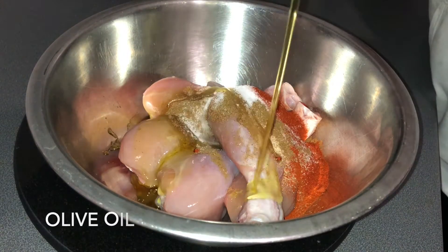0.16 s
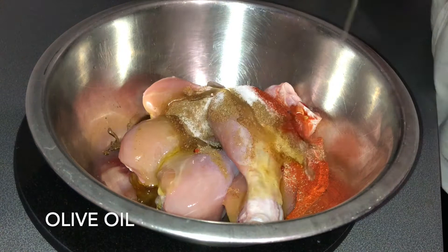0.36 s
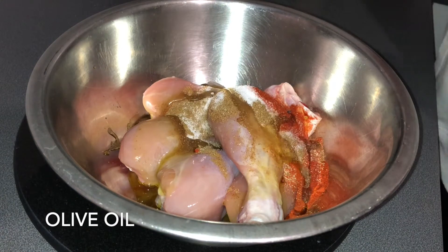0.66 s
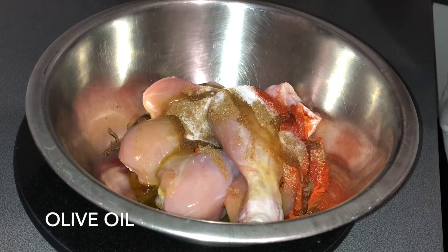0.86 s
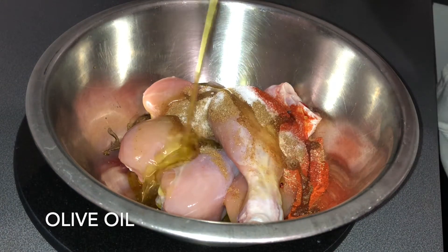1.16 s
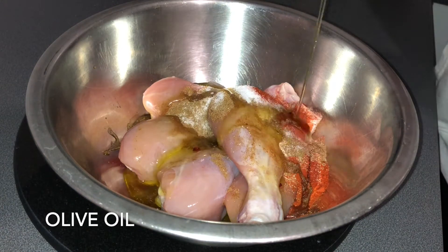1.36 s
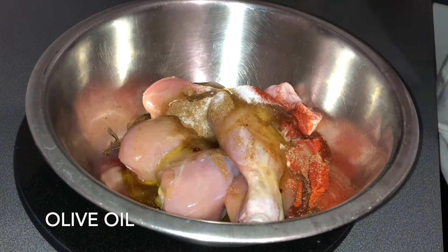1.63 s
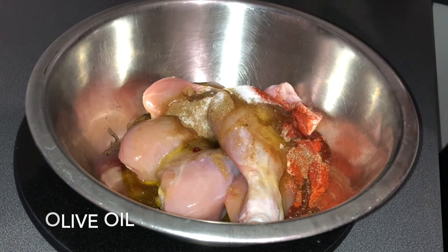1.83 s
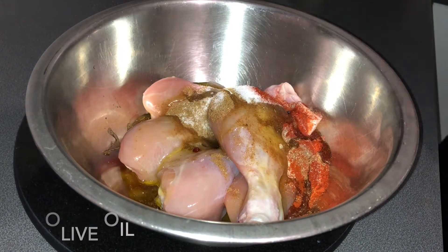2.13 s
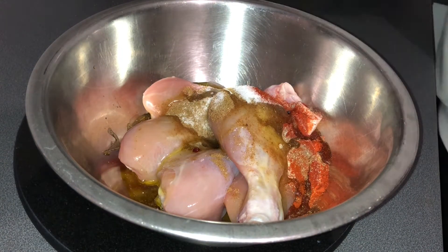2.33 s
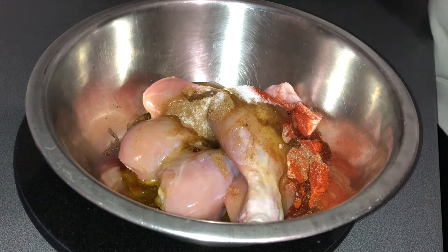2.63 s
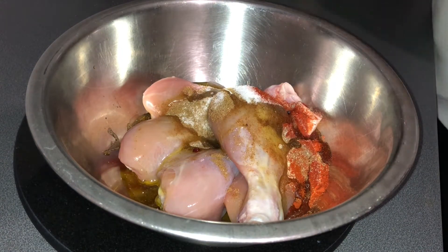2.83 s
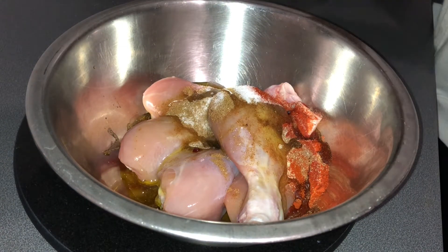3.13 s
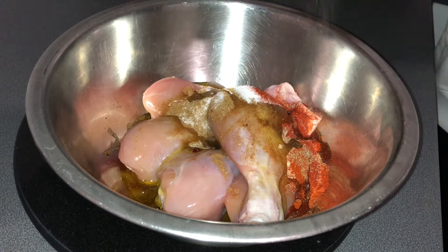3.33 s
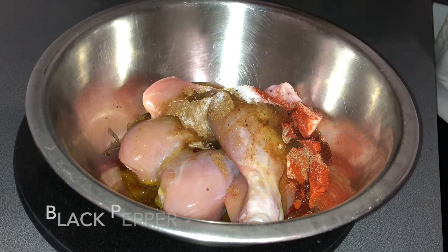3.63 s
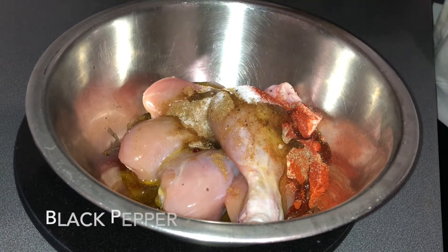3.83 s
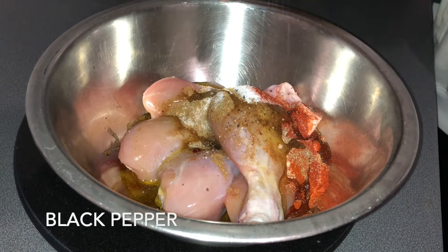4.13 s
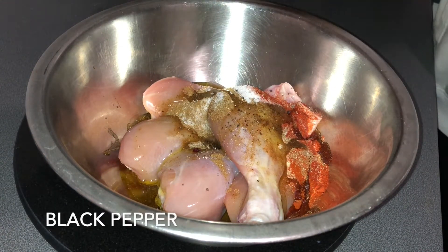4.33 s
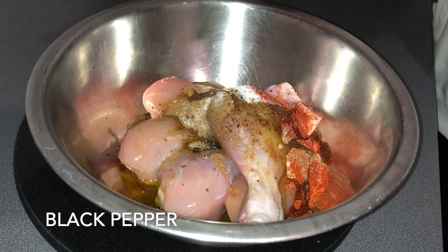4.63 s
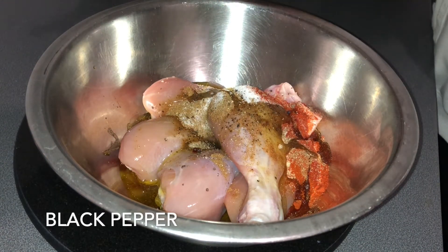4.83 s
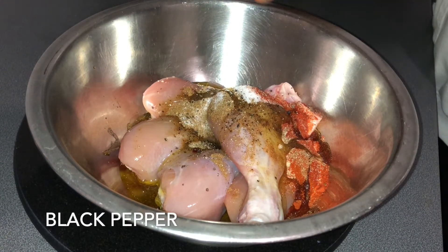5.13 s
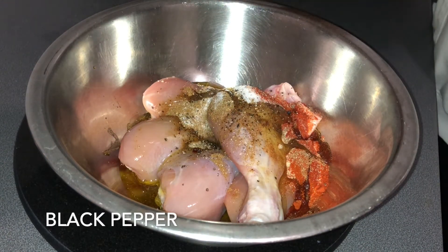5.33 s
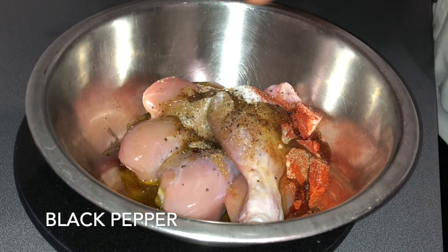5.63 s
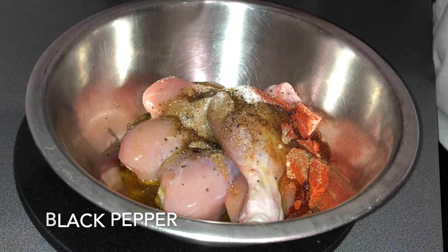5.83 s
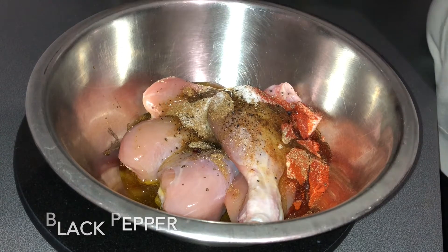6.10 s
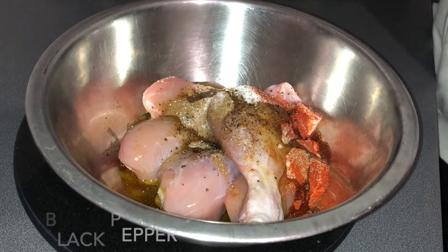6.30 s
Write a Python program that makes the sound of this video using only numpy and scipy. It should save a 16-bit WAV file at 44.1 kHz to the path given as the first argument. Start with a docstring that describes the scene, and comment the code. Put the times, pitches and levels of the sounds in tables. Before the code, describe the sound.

In a quiet kitchen, a bottle is set down and handled, then a pepper mill is twisted in short crunchy strokes and put down.

```python
"""A quiet kitchen with a fan and a faint hum, made from shaped noise and wavering tones.
A bottle is set down and handled on the worktop: blows ring its modes, rubbing fingers are grainy noise.
Then a pepper mill is twisted in short strokes over a steel bowl: the burrs crunch, corns crack and tumble
inside, all as tiny impacts ringing the mill's modes, and it is put back on the worktop."""
import sys
import numpy as np
from scipy import signal
from scipy.fft import rfft, irfft
from scipy.io import wavfile
from scipy.ndimage import uniform_filter1d

SR = 44100
rng = np.random.default_rng(int(sys.argv[2]) if len(sys.argv) > 2 else 0)


def persist_wave(psi):
    """Save psi, clipped to +-1, as 16-bit WAV."""
    counts = np.round(np.clip(psi, -1, 1) * 32767).astype(np.int16)
    wavfile.write(sys.argv[1], SR, np.atleast_2d(counts).T)


N = 284886  # length of the scene in samples


def gain_of(db):
    """Turns decibels into a gain."""
    return 10 ** (np.asarray(db) / 20)


def evened(x):
    """Scales a sound to an rms of 1."""
    return x / np.sqrt(np.mean(x ** 2) + 1e-20)


def read(points, hz):
    """Reads a curve of (Hz, value) points on a log-frequency axis."""
    f, value = np.transpose(points)
    return np.interp(np.log(hz + 1), np.log(f + 1), value)


def add(mix, s, sound):
    """Mixes a sound in, starting at time s in seconds."""
    part = mix[round(s * SR):][:len(sound)]
    part += sound[:len(part)]


def follow(points):
    """Joins (seconds, value) points into a curve over all samples."""
    return np.interp(np.arange(N) / SR, *np.transpose(points))


def resonate(x, hz, width):
    """Rings a two-pole resonance with gain near 1 at its centre; width in Hz."""
    r = np.exp(-np.pi * width / SR)
    return signal.lfilter([1 - r, 0, r - 1], [1, -2 * r * np.cos(2 * np.pi * hz / SR), r * r], x)


def coloured(x, points):
    """Filters a sound by a spectrum curve and scales it to an rms of 1."""
    gain = gain_of(read(points, np.fft.rfftfreq(N, 1 / SR)))
    return evened(irfft(rfft(x) * gain, N))


def split(x, hz):
    """Gives the parts below and above hz."""
    low = signal.butter(4, hz, fs=SR, output="sos")
    high = signal.butter(4, hz, "high", fs=SR, output="sos")
    return signal.sosfilt(low, x), signal.sosfilt(high, x)


def wander(shape, size, axis=-1):
    """Random noise smoothed by a running mean over size samples."""
    return uniform_filter1d(rng.standard_normal(shape), size=size, axis=axis)


def grains(per_s, spread_db, smooth):
    """Tiny impacts about a millisecond long, most small and a few large, over a share of smooth hiss."""
    size_db = spread_db * np.minimum(rng.exponential(1, N), 3)
    hits = gain_of(size_db) * (rng.random(N) < per_s / SR)
    swell = np.sqrt(np.convolve(hits ** 2, np.hanning(50), "same"))
    return (evened(swell) + smooth) * rng.standard_normal(N)


# Every stroke of the hand swells from and dies to EDGE_DB under its full force, then goes on fading.
EDGE_DB, RISE_BEND, FALL_BEND = -28, 1.48, 1.49


def stroke(s, rise, hold, fall, db):
    """Force of one movement of the hand: it swells, holds and dies away."""
    t = np.arange(N) / SR - s
    before = np.maximum(-t / rise, 0)
    after = np.maximum((t - hold) / fall, 0)
    return gain_of(db + EDGE_DB * (before ** RISE_BEND + after ** FALL_BEND))


def blended(rows, rest, first, second):
    """Plays three parts under strokes; a row's last two columns give the shares of the last two parts."""
    power = np.zeros((3, N))
    for *shape, first_db, second_db in rows:
        a, b = np.minimum(gain_of([first_db, second_db]), 1) ** 2
        shares = [max(1 - a - b, .03), a, b]
        power += np.outer(shares, stroke(*shape) ** 2)
    parts = [evened(rest), evened(first), evened(second)]
    return (np.sqrt(power) * parts).sum(axis=0)


# Colour of the broad fan and room noise. Each row: frequency in Hz, relative level in dB per Hz.
AIR_COLOUR = [(24, -75), (40, -24.5), (87, -3), (168, -25), (206, -33), (239, 2.5), (406, 2), (473, -12),
              (656, -36), (725, -2.5), (1990, -7), (2200, -28.5), (2370, -14), (10500, -30), (16500, -24)]
# Level of the room noise over time. Each row: time in seconds, level in dB.
AIR_LEVEL = [(0., -70), (1.33, -70), (2.3, -65.5), (3.85, -65.5), (4.05, -63.5), (5.43, -66.5),
             (5.97, -69.5), (6.2, -67.5), (6.46, -74.5)]
# Noise resonances of the duct. Each row: frequency in Hz, width in Hz, level in dB over the broad noise.
DUCT = [(158.6, 17, -2), (275, 45, -15.5), (495, 44, -3), (586, 20, -5.5), (1746, 540, 1.5)]
# Tones of the hum. Each row: frequency in Hz, level of the steady part in dB rms.
HUM = [(96.9, -74.5), (161.5, -77), (242.2, -77), (441.4, -77), (473.7, -75.5), (737.5, -82)]


def air():
    """Fan noise with drifting patches, a few duct resonances and a wavering hum."""
    frames, bin_hz = N // 256 + 5, np.fft.rfftfreq(1024, 1 / SR)
    a, b, patches = rng.standard_normal((frames, 513, 3)).T
    patches = evened(uniform_filter1d(uniform_filter1d(patches, 10, 0), 12, 1))
    spectrum = (a + 1j * b) * gain_of(read(AIR_COLOUR, bin_hz)[:, None] + 1.5 * patches)
    wash = evened(signal.istft(spectrum, nperseg=1024, noverlap=768)[1][:N])
    duct = np.zeros(N)
    for hz, width, db in DUCT:
        duct += gain_of(db) * evened(resonate(rng.standard_normal(N), hz, width))
    hum = np.zeros(N)
    for hz, db in HUM:
        steady = evened(np.sin(2 * np.pi * hz * np.arange(N) / SR))
        waver = evened(resonate(rng.standard_normal(N), hz, 6.2))
        hum += gain_of(db) * (steady + .5 * waver)
    return (wash + duct) * gain_of(follow(AIR_LEVEL)) + hum


# Fingers rubbing bottle and mill. Each row: full force from this time in seconds, rise, hold and fall
# in seconds, level in dB, share of the squeak in dB, share of the hiss in dB (above 0 counts as 0).
RUSTLES = [(.002, .005, 0.022, .03, -75, -24, 0), (1.288, .005, .022, .04, -70, -26, 2),
           (1.72, .01, 0.065, .01, -77, -9.5, -17), (1.814, 0.0055, .01, 0.17, -62, -5.5, -18),
           (1.882, .008, .02, .12, -59, -16, -21), (1.952, 0.02, 0.004, 0.037, -47, -21, -21),
           (2.015, 0.021, .015, .05, -61, -9, -2), (2.24, .04, 0.099, .02, -69, -11, -14),
           (2.342, .01, .01, 0.073, -61.5, -26, -14), (2.568, .04, 0.055, 0.038, -61, -20, -3.5),
           (2.812, .008, 0.032, 0.026, -62, -22, 1), (2.866, .03, .015, .04, -63, -12, -11),
           (3.03, .005, .062, .04, -63.5, -22, -2.5), (6.358, 0.036, .005, .07, -72.5, -4.5, -8),
           (6.442, 0.041, 0.0045, 0.059, -71, -10, -21)]
# Colour of the broad rub. Each row: frequency in Hz, relative level in dB per Hz.
RUSTLE_COLOUR = [(290, -33), (500, -4), (1050, -0.5), (1170, -6.5), (2650, -7.5), (2980, -3), (3300, -9),
                 (7820, -11.5), (8540, -7), (15100, -13), (16500, -34)]
# The squeak's resonance, played through twice: frequency in Hz, width of each pass in Hz.
SQUEAK = (8430, 1700)


def rustle():
    """Skin sticking and slipping on glass and plastic: a broad rub, a narrow squeak and a thin hiss."""
    rub, squeak, hiss = (grains(per_s=400, spread_db=2.5, smooth=1.2) for _ in range(3))
    rub = split(coloured(rub, RUSTLE_COLOUR), 8900)[0]
    squeak = resonate(resonate(squeak, *SQUEAK), *SQUEAK)
    hiss = split(hiss, 10600)[1]
    return blended(RUSTLES, rub, squeak, hiss)


# Small ticks of cap, glass and fingers. Each row: start in seconds, level of the ring in dB, rough pitch
# in Hz, time for the ring to die by 60 dB in seconds, level of the broad snap in dB against the ring.
TICKS = [(.164, -64, 13000, .01, 0), (.233, -61, 12500, .012, -4), (1.5793, -47, 1873, 0.079, -7),
         (1.579, -43.5, 3020, 0.021, -8), (1.603, -43.5, 3150, 0.021, -25), (1.818, -55, 8600, .02, 5),
         (1.883, -41.5, 8400, .021, -3), (1.945, -53, 11400, .017, -4), (1.948, -53, 8700, 0.019, -4),
         (1.9531, -41, 2960, 0.022, -13), (1.96, -44.5, 3750, 0.036, -17), (2.549, -41.5, 3200, .015, 0.5),
         (2.62, -65, 5960, 0.016, 8), (2.776, -52, 12900, .011, -9), (2.956, -48.5, 10100, .02, .1),
         (2.993, -39, 12300, 0.017, -5.5), (3.042, -51, 11400, .025, -11), (3.087, -49, 4160, 0.027, -2),
         (4.551, -55, 12000, .012, 6), (4.57, -52, 12000, .012, -2), (4.611, -58, 14500, .012, -8),
         (5.695, -50, 5600, 0.022, 4), (5.727, -56, 6450, 0.019, 9.5), (5.809, -47.5, 11400, 0.011, -21),
         (6.018, -63, 13800, 0.014, -1), (6.262, -56.5, 5840, 0.013, 3.5)]
TICK_RISE_S = 0.00037


def ticks():
    """A short ring at one pitch, rising as the contact stiffens, with a broader snap on top."""
    out, t = np.zeros(N), np.arange(2600) / SR
    for s, level_db, hz, t60, snap_db in TICKS:
        ring = np.sin(2 * np.pi * hz * t * (.98 + 2.6 * t))
        ring *= gain_of(-60 * t / t60) * np.minimum(t / TICK_RISE_S, 1)
        ring *= 1 + .35 * evened(wander(len(t), round(6 * SR / hz)))  # the contact chatters
        snap = split(rng.standard_normal(len(t)), 0.21 * hz)[1]
        snap *= gain_of(snap_db - 60 * t / 0.018)
        add(out, s, gain_of(level_db) * (ring + snap))
    return out


# How fast the room's echoes die. Each row: frequency in Hz, time to fall by 60 dB in seconds.
ROOM = [(200, 0.13), (1000, 0.24), (4000, 0.12), (16000, 0.1)]


def room(x):
    """Sparse echoes of random sign, each band dying at its own speed."""
    taps = np.zeros(SR // 2)
    at = np.arange(100, len(taps) - 20, 20)
    taps[at + rng.integers(0, 20, len(at))] = rng.choice([-1., 1.], len(at))
    hz, t, bands = signal.stft(taps, SR, nperseg=256)
    fade = gain_of(-60 * t / read(ROOM, hz)[:, None])
    tail = signal.istft(bands * fade, SR, nperseg=256)[1]
    return signal.fftconvolve(x, tail / np.linalg.norm(tail))[:N]


# Things set down on the worktop. Each row: start in seconds, level in dB, lowest modes in dB, modes near
# 500 Hz in dB, modes near 900 Hz in dB, slope above 1 kHz in dB per octave, tick in dB,
# factor on the ringing times, rise in seconds (low modes take longer).
KNOCKS = [(0.5698, -18.5, 0.5, 5.5, -8.5, -7.5, -30.5, 0.44, 0.0027),
          (1.817, -30.5, 1.5, 7, 0, -2.5, -35, 0.36, 0.00092),
          (1.952, -32, 1.5, -11, -6, 1.5, -11, 0.37, 0.00099),
          (2.346, -22, -2, 2, 4, -17.5, -30, 1, 0.0019), (2.403, -35, -2, 2, -4, -15, -40, 1.07, 0.0041),
          (6.159, -17, 1.5, 9.5, 0.5, 1.5, 0.5, 1.15, 0.0011),
          (6.267, -27, -12, 1.5, -4, -22.5, -40, 0.81, 0.0038)]
# Modes of the worktop. Each row: frequency in Hz, level in dB, time in seconds to fall by 60 dB
# before the knock's own factor.
WORKTOP = [(178, -6, 0.085), (223, -4, 0.097), (283, -2.5, 0.36), (375, 1, 0.18), (439, -9, 0.11),
           (480.3, -17, 0.39), (566, -2.5, 0.11), (687, -9, 0.13), (804, 3, 0.048), (914, 5, 0.049),
           (950, -1, 0.033), (1178, -7, 0.093), (1431, -9, 0.19), (1585, -5.5, 0.13), (1816, -16, 0.14),
           (2053, 1.5, 0.062), (2458, -8.5, 0.12), (3164, 11.5, 0.015), (3760, -13.5, 0.17),
           (5090, -3.5, 0.041), (6940, -24, .04), (9000, -5, 0.028), (11400, -4, 0.014)]


def knocks():
    """A blow rings the worktop modes, a soft one mostly the low ones; first contact adds a bright tick."""
    out, t = np.zeros(N), np.arange(SR // 4) / SR
    hz, db, t60 = np.transpose(WORKTOP)[:, :, None]
    for s, level_db, low_db, mid_db, upper_db, slope_db, tick_db, ring, rise in KNOCKS:
        # where the blow lands sets the balance of the modes
        spot_db = np.select([hz < 380, hz < 720, hz < 1100], [low_db, mid_db, upper_db])
        weight = gain_of(db + spot_db + slope_db * np.maximum(np.log2(hz / 1000), 0))
        # each mode is a cluster; low clusters are narrower, higher up close modes crowd and beat
        a, b = wander((2, len(hz), len(t)), 130, axis=2) * np.sqrt(130)
        a, b = (np.where(hz < 1300, 2 * uniform_filter1d(v, size=500, axis=1), v) for v in (a, b))
        cluster = 1 + np.clip(hz / 700, .45, 2) * (a + 1j * b) * .8
        build = np.minimum(t / (rise + 0.37 / hz), 1)  # low modes build more slowly
        fade = gain_of(-60 * t / (ring * t60))
        turn = np.exp(2j * np.pi * (hz * t + rng.random(hz.shape)))
        body = (weight * fade * cluster * turn * build).real.sum(axis=0)
        body = body / np.linalg.norm(weight) / 2
        tick = rng.standard_normal(len(t))
        tick *= gain_of(-60 * t / 0.01) + 0.067 * gain_of(-60 * t / 0.18)
        sound = body + gain_of(tick_db) * split(tick, 1130)[1]
        add(out, s, gain_of(level_db) * sound)
    return split(out, 130)[1]


# Something dragged over the worktop. Each row: full force from this time in seconds, rise, hold and fall
# in seconds, level in dB.
SLIDE = [(2.57, .05, 0.052, 0.033, -62), (2.638, 0.047, .05, 0.019, -49)]
SLIDE_HZ, SLIDE_HZ_PER_S = 280, 150  # pitch in the middle of the last drag, and its climb


def slide():
    """The base stutters near a low worktop mode; friction noise rings the lowest eight."""
    rub = rng.standard_normal(N)
    body = evened(sum(gain_of(db) * resonate(rub, hz, width=50.0) for hz, db, _ in WORKTOP[:8]))
    middle_s = SLIDE[-1][0] + SLIDE[-1][2] / 2
    hz = SLIDE_HZ + SLIDE_HZ_PER_S * (np.arange(N) / SR - middle_s)
    waver = evened(wander(N, 900))
    stutter = np.sin(2 * np.pi * np.cumsum(hz * (1 + 0.049 * waver)) / SR)
    return sum(stroke(*row) for row in SLIDE) * (stutter + 0.4 * body)


# Modes of the mill's body; the first three rows are the main ones. Each row: frequency in Hz,
# base width in Hz (cracks and tumbling corns widen it), level in dB.
MILL = [(3117, 234, 3), (2865, 260, -4), (3430, 410, -5), (4180, 350, -6.5), (4970, 210, -8),
        (6080, 540, -6), (6830, 500, -7), (7930, 670, -8.5), (9540, 990, -7), (11360, 1700, -6),
        (12280, 3500, -4.5), (13900, 1070, -19), (15800, 550, -14.5), (1875, 480, -10)]
# How loudly the loose corns shift. Each row: time in seconds, level in dB.
TUMBLE = [(2.76, -84), (2.95, -63.5), (3.1, -67), (3.125, -76), (3.27, -72), (3.42, -49.5), (3.83, -77),
          (4.1, -62), (4.52, -67), (5.38, -60.5), (5.55, -77), (5.64, -53), (5.81, -78), (5.84, -78)]
# Colour of the tumbling corns. Each row: frequency in Hz, filter gain in dB.
TUMBLE_COLOUR = [(1760, -28.5), (3000, -11.5), (3510, -5), (4190, -4.5), (5870, -14.5), (9260, -3),
                 (11700, 4.5), (15100, -2.5), (16200, 13.5), (16500, -41)]


def tumble():
    """Loose corns tick against each other and the mill wall: tiny impacts, a separate set for each mode."""
    level = follow([(s, gain_of(db)) for s, db in TUMBLE])
    first, last = round(TUMBLE[0][0] * SR), round(TUMBLE[-1][0] * SR)
    level[:first] = level[last:] = 0
    ticking = np.zeros(N)
    for hz, width, _ in MILL:
        ticking += evened(resonate(grains(per_s=120, spread_db=3.5, smooth=.8), hz, 1.5 * width))
    thin = evened(resonate(ticking, 11600, 350.))  # one high mode stands out
    return level * (coloured(ticking, TUMBLE_COLOUR) + 0.29 * thin)


# Twists of the mill. Each row: full force from this time in seconds, rise, hold and fall in seconds,
# crunch level in dB, share of the main body modes in dB, share of the top modes in dB.
TWISTS = [(3.203, 0.037, 0.032, 0.055, -34, -3, -6.5), (3.334, 0.055, 0.0094, 0.037, -40, -6, -3.5),
          (3.425, 0.053, 0.011, 0.022, -35.5, -5.5, -6.5), (3.497, 0.016, 0.052, 0.018, -43.5, -9.5, -3),
          (3.61, 0.052, 0.018, .012, -33, -6, -4), (3.812, 0.039, 0.013, 0.061, -34, -3, -6),
          (4.015, 0.026, 0.015, 0.059, -32, -2.5, -6.5), (4.228, 0.026, 0.023, 0.073, -36.5, -3.5, -7),
          (4.455, 0.035, 0.039, 0.029, -36, -3.5, -8), (4.69, 0.033, 0.014, 0.053, -35.5, -10.5, -6),
          (4.903, .03, 0.04, 0.0061, -36, -7, -7.5), (5.135, 0.029, .01, 0.046, -32, -6, -6),
          (5.385, 0.056, 0.024, 0.039, -39.5, -9.5, -4), (5.615, 0.012, 0.017, .045, -32, -8, -6)]


def crunch():
    """Burrs crushing corns: dense grains, partly common to all mill modes, partly ringing only one."""
    shared = grains(per_s=600, spread_db=3, smooth=.7)
    rest, main, top = np.zeros((3, N))
    for k, (hz, width, db) in enumerate(MILL):
        drive = shared + grains(per_s=300, spread_db=3.5, smooth=.5)
        # each mode's level drifts slowly at random, so the crunch changes colour
        points = np.arange(N // 1500 + 2)
        drift = np.interp(np.arange(N) / 1500, points, rng.standard_normal(len(points)))
        ring = gain_of(db + 3 * evened(drift)) * resonate(drive, hz, width)
        group = main if k < 3 else top if hz > 8500 else rest
        group += (-1) ** k * ring
    rest = split(rest, 820)[1]
    rest += gain_of(-17.0) * rest.std() * evened(resonate(shared, 480, 530.0))  # a dull rub underneath
    return blended(TWISTS, rest, main, top)


# Single corns cracking and the mill clicking. Each row: time in seconds, peak in dB before the bass is
# cut, brightness in dB.
CRACKS = [(3.202, -14.5, 0), (3.2035, -12.5, 15), (3.2251, -29, -10), (3.228, -38, -1), (3.2428, -16, -17),
          (3.3139, -25, -18), (3.3267, -37, -14), (3.3534, -25.5, -2), (3.422, -23, 7), (3.431, -19, -5),
          (3.49, -31, -4), (3.5755, -26.5, 7), (3.605, -31, 0), (3.6303, -22, -8), (3.662, -25, -8),
          (3.6629, -17, 2), (3.7472, -31.5, 6), (3.7605, -30.5, 5), (3.7906, -30, -12), (3.8302, -20, -13),
          (3.8577, -28, 16), (3.8846, -23.5, -4.5), (3.9587, -35, -6), (3.998, -25, 1), (4.016, -16, -7),
          (4.025, -14.5, -2), (4.1001, -17.5, 8), (4.102, -15, 3), (4.225, -24, 3), (4.241, -18, 3.5),
          (4.255, -12, -5), (4.2565, -16.5, 4), (4.3988, -33.5, -2), (4.402, -20.5, 0),
          (4.414, -21.5, -9.5), (4.442, -23, -7.5), (4.453, -9.5, 26.5), (4.4843, -18, 1),
          (4.4939, -25.5, -32), (4.5421, -30, 13), (4.6284, -26, -3.5), (4.634, -29.5, 10),
          (4.6734, -19, 4), (4.6894, -20, -9.5), (4.696, -20.5, -16), (4.7092, -14.5, 10),
          (4.7316, -19.5, -13), (4.7754, -30, 9), (4.778, -22.5, 11), (4.864, -40, 12), (4.9011, -12.5, 7),
          (4.9076, -11, -2), (4.9338, -20.5, -9), (4.984, -25.5, 2), (5.0603, -32, -21), (5.0885, -47, -15),
          (5.1083, -27, -17), (5.119, -27, -9), (5.1343, -15, 3.5), (5.144, -28, 1), (5.2102, -20.5, 4.5),
          (5.2665, -33, -8), (5.271, -37, -8), (5.284, -34, 14), (5.3004, -17.5, -9.5), (5.3453, -19.5, -4),
          (5.365, -28, 5), (5.3853, -15.5, -7), (5.466, -36.5, 1), (5.6103, -10.5, -8.5),
          (5.623, -26, -20.5), (5.64, -21, -5)]
CRACK_LOW_DB, CRACK_MID_DB, CRACK_TOP_DB = -4.5, 2, 8  # mode groups of a crack of brightness 0


def cracks():
    """Each crack is a burst of about a millisecond that rings the mill's modes in its own mix."""
    out, t = np.zeros(N), np.arange(900) / SR
    hz, width, db = np.transpose(MILL)
    fade = np.exp(-np.pi * 1.1 * np.maximum(width, 300.)[:, None] * t)
    modes = fade * np.sin(2 * np.pi * hz[:, None] * t)
    burst_t = np.arange(90) / SR
    for s, peak_db, bright_db in CRACKS:
        low_db, top_db = CRACK_LOW_DB - bright_db / 2, CRACK_TOP_DB + bright_db / 2
        mix_db = db + 2.5 * rng.standard_normal(len(MILL))
        mix_db += np.where(hz < 4500, low_db, np.where(hz > 8500, top_db, CRACK_MID_DB))
        burst = rng.standard_normal(90) * burst_t * np.exp(-burst_t / .00045)
        sound = np.convolve(gain_of(mix_db) @ modes, burst)
        add(out, s - .0004, gain_of(peak_db) * sound / abs(sound).max())  # early, as the burst swells
    return split(out, 2200)[1]


def scene():
    """All sources in the kitchen; ticks, knocks, crunch and cracks also echo in the room."""
    near = ticks() + knocks() + crunch() + cracks()
    return (air() + rustle() + near + gain_of(-12) * room(near) + slide() + tumble())[None]


EDGE_HZ = 15800  # upper limit of the sound


def record(dry):
    """The microphone drops the deepest bass; then the band limit removes the highest treble."""
    thin = signal.sosfilt(signal.butter(2, 60, "high", fs=SR, output="sos"), dry)
    band_limit = signal.firwin(255, EDGE_HZ, window=("kaiser", 9), fs=SR)
    return signal.oaconvolve(thin, band_limit[None], "same")


dry = scene()
out = record(dry)
persist_wave(out)
```